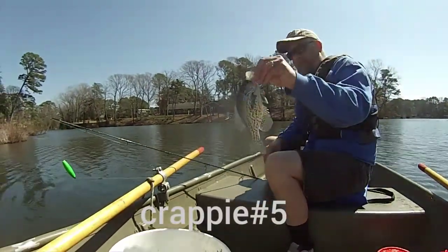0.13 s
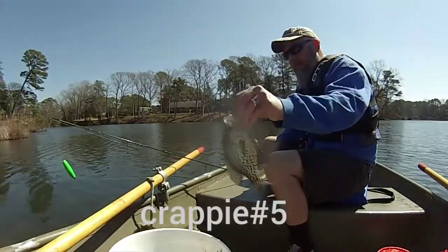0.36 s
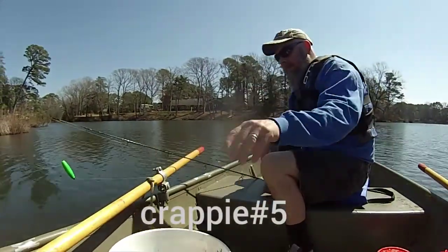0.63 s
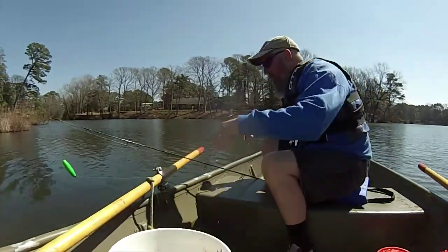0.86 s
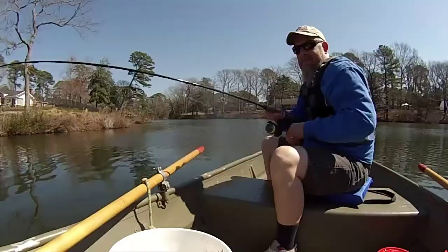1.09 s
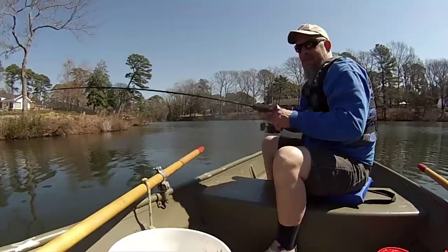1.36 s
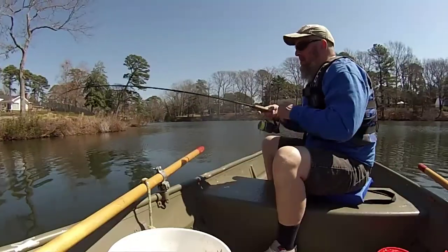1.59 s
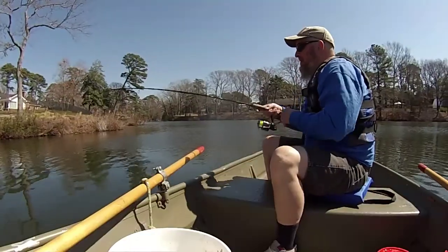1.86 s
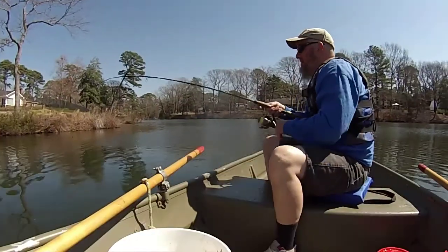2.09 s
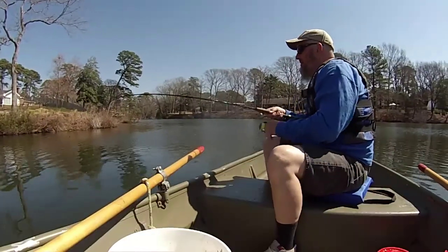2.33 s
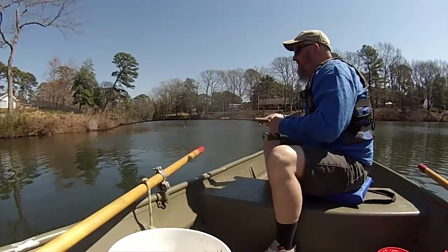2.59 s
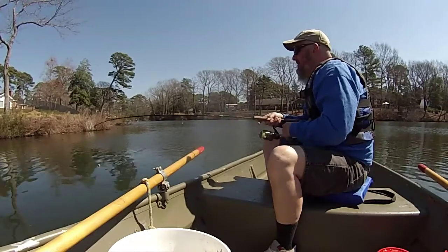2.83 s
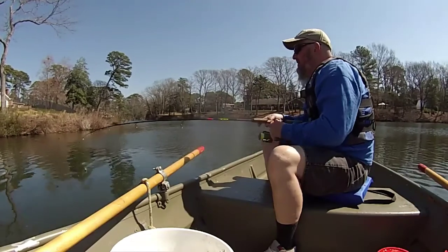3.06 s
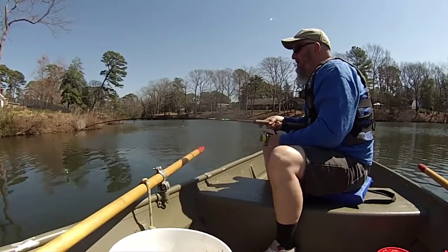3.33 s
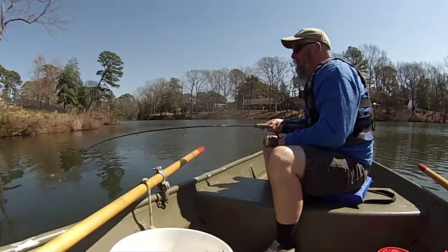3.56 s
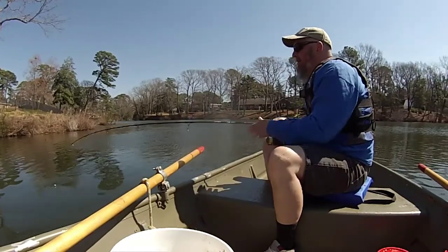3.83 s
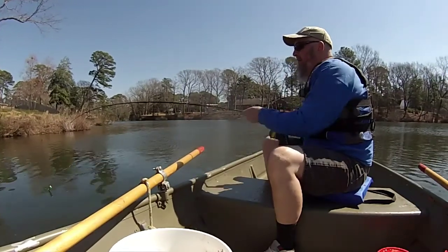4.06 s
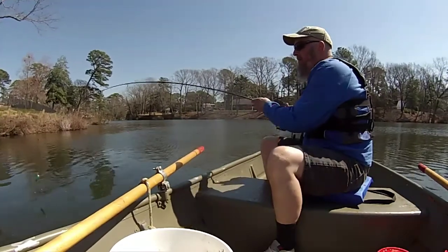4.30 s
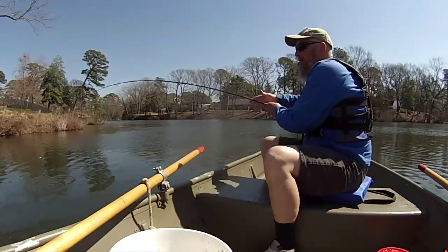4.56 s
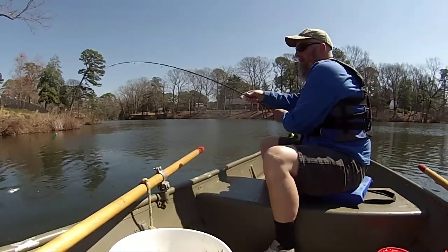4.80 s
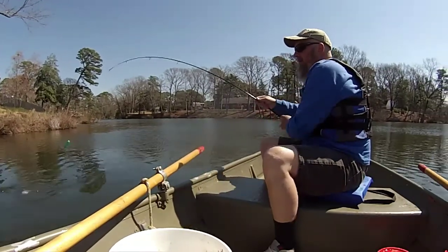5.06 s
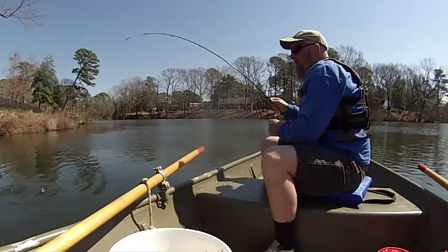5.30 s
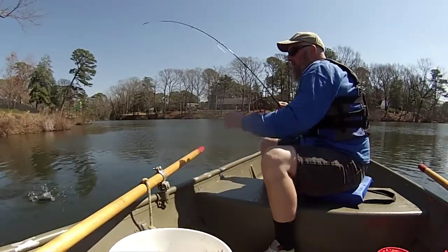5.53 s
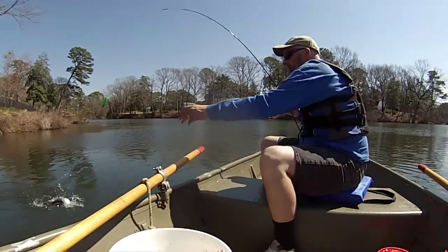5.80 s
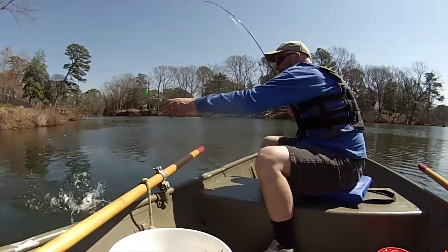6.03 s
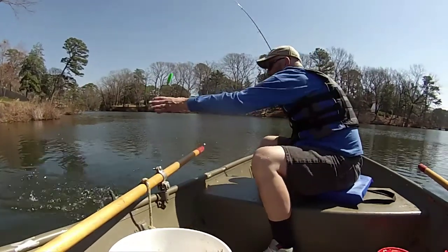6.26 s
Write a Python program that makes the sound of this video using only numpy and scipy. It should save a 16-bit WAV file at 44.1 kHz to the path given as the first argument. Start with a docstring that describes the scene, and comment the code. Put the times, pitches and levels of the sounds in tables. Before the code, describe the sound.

Wet slaps and hollow knocks on a small metal boat, a brief dropout, ticking reel, more bangs, then a fish splashing, over rumbling wind.

```python
"""Wet slaps and hollow knocks on a small metal boat on a lake, over wind rumble, nearly mono.
A loose part taps, a fishing reel ticks, and a fish splashes at the surface; water slops softly.
Hull sounds are short pushes or bursts of noise that set resonances ringing; the reel is scratches
into resonances; the splash is crackle and bubbles. Early on the sound stops dead, then fades in.
The listener is a microphone in a closed housing, which colours the slaps and the spray."""
import sys
import numpy as np
from scipy import signal
from scipy.io import wavfile

SR = 44100
rng = np.random.default_rng(int(sys.argv[2]) if len(sys.argv) > 2 else 0)


def store_pcm(level_fs):
    """Save levels as 16-bit WAV."""
    pcm = np.round(np.clip(level_fs, -1, 1) * 32767).astype(np.int16)
    wavfile.write(sys.argv[1], SR, np.atleast_2d(pcm).T)


def magnitude_from_level(level_db):
    """Linear magnitude for a level in decibels (20 dB per decade)."""
    exponent = np.asarray(level_db, float) / 20
    return 10 ** exponent


N = 282240

# In all tables, "fade" is the time in which a sound dies by 60 dB.
AIR_DB, SIDE_HISS_DB = -58.5, -75.5     # distant hiss; faint hiss that differs left and right
# Colour of the distant hiss. Each row: pitch in Hz, relative level in dB per Hz.
AIR_COLOUR = [(410, -1), (700, -2.5), (971, -14), (1170, 1), (1360, -8), (2630, -11.5), (8100, -21),
              (9600, -23.5), (13900, -26), (15200, -24), (16000, -46)]

# Wind on the microphone. Each row: time in seconds, rumble in dB, extra flutter in dB.
GUSTS = [(0.0, -36.5, 7), (0.5, -29.5, -6), (0.6, -19.5, -12.5), (0.71, -34.5, 1.5), (0.94, -24, 16.5),
         (0.98, -24, -5), (1.41, -28.5, 1), (1.75, -8.5, -8), (1.85, -24, -2), (2.03, -24, -2),
         (2.05, -26.5, -3), (2.78, -31.5, -4.5), (3.14, -18, -5), (3.28, -18.5, 9), (3.46, -29, 17.5),
         (3.49, -20.5, 8.5), (3.72, -24, -0.5), (3.9, -23, -2.5), (4.35, -30, -6), (5.4, -30, -3.5),
         (5.65, -39.5, 3), (6.38, -34.5, -2.5), (6.4, -41.5, 14)]
# Colour of the wind. Each row: pitch in Hz, relative level in dB per Hz.
RUMBLE_COLOUR = [(20, 5.5), (35, 0.5), (60, -1), (95, -3.5), (130, -7), (198, -11.5), (260, -18.5),
                 (375, -24.5), (600, -50), (900, -74)]
# Size and speed of the rumble's quick random lumps; share of them that reaches the flutter.
LUMP_DB, LUMPS_PER_S, FLUTTER_SHARE = -0.5, 61, 0.96

# Hollow puffs of water along the hull. Each row: time in seconds, level in dB, starting centre in Hz.
SLOP = [(0.0, -43.5, 630), (.178, -42, 792), (0.343, -44.5, 600)]
SLOP_RISE_S, SLOP_FADE_S, SLOP_SINK_OCT_PER_S, SLOP_HALF_WIDTH_HZ = 0.038, 0.54, 3, 183

# Thin dry clicks. Each row: start in seconds, level in dB, rise in ms, hint of pitch in Hz.
CLICKS = [(1.074, -23.5, 0.087, 300), (1.6097, -31.5, 0.1, 500), (1.6731, -31.5, .06, 900),
          (1.7378, -29.5, 0.29, 2250), (1.7397, -30.5, 0.075, 4480)]

# Turns of the reel handle. Each row: start in seconds, length in seconds, level in dB, ticks per second.
TURNS = [(1.786, 0.096, -53.5, 110), (1.958, 0.274, -53, 90), (2.27, 0.1635, -55, 140),
         (2.47, 0.135, -56.5, 45), (2.618, 0.046, -59.5, 80), (2.674, 0.076, -55, 90),
         (2.794, 0.011, -58, 90), (2.986, 0.0058, -59, 60), (3.018, 0.009, -59, 60)]
TURN_EDGE_S, TURN_GROWTH_DB_PER_S = 0.02, 2
# Resonances of the reel. Each row: pitch in Hz, width in Hz before narrowing, relative level in dB.
REEL_MODES = [(1740, 39, -2.5), (2700, 23, 0), (4300, 117, 8.5), (5350, 82, -5), (7100, 110, -8.5),
              (7680, 74, -2), (9000, 190, -11), (10400, 250, -12), (13400, 240, -15)]
# Reel pitch as the load on the line changes. Each row: time in seconds, shift in widest steps (held to -1..1).
REEL_PITCH = [(1.78, 0.068), (1.88, -0.39), (1.96, 0.25), (2.01, -0.74), (2.1, 0.49), (2.3, 0.65),
              (2.42, 0.092), (2.49, -.5), (2.54, 0.52), (2.65, -0.57), (2.7, -0.12), (2.8, -1.3), (2.98, 0)]
REEL_WIDEST_STEP, REEL_WAVERS_PER_S = 0.03, 12     # share of pitch; speed of random wavering
TICK_SPREAD_DB, SCRATCH_S = 2.0, 0.0022
REEL_RUB = 0.08     # steady rubbing, as a share of a tick
REEL_SPAN = slice(int(1.7 * SR), int(3.1 * SR))

# The fish breaks the surface. Each row: time in seconds, spray in dB, gurgle in dB, fade in seconds.
SPLASHES = [(5.4, -60, -71.5, 0.081), (5.475, -77, -54.5, 1.3), (5.528, -58, -62, 0.055),
            (5.552, -62, -53, .06), (5.567, -50, -62, 0.066), (5.62, -75, -67, 0.44),
            (5.665, -71, -58.5, 0.3), (5.768, -59, -49, 0.1), (5.799, -56, -65, 1.4),
            (5.839, -70, -45, 0.34), (5.88, -54, -66, 0.19), (5.938, -53.5, -49.5, 0.32),
            (6.039, -57, -43, 0.092), (6.08, -76, -78, 7.1), (6.13, -66, -55, 0.23),
            (6.187, -59, -58, 0.36), (6.248, -55.5, -68, .08), (6.283, -56.5, -56, 0.12)]
# Large bubbles. Each row: start in seconds, level in dB, first pitch in Hz, rise in octaves per second,
# fade in seconds.
BUBBLES = [(5.398, -25.5, 2890, 6.2, 0.0085), (5.475, -46, 1064, 5.4, 0.071),
           (5.511, -45, 1210, 4.9, 0.053), (5.556, -46, 1610, 4.6, 0.05), (5.557, -36.5, 3100, 3, 0.02),
           (5.556, -39, 425, 5, 0.043), (5.725, -44.5, 900, 6, .03), (5.6, -42.5, 4250, 2.4, 0.017),
           (5.71, -49, 3100, 2.6, 0.026), (5.74, -41.5, 610, 6.6, 0.057), (5.766, -51, 1530, 6, .02),
           (5.791, -37, 1350, 5, 0.015), (5.831, -35, 607, 18, 0.16), (5.857, -38, 2510, 3, .015),
           (5.887, -41, 2130, 3, 0.024), (5.965, -42.5, 4300, 3, .012), (5.954, -42.5, 1040, 4.6, 0.039),
           (5.55, -39, 4000, 3, 0.011), (5.565, -38, 4530, 3, .02), (5.848, -30, 1215, 3.9, 0.025),
           (5.858, -29.5, 392, 7.7, 0.041), (5.874, -25.5, 4300, 3, 0.0072), (5.89, -27.5, 456, 3.1, 0.023),
           (5.938, -33, 3150, 1.8, 0.022), (6.038, -34, 900, 9, 0.012), (6.04, -44, 1640, 3.6, 0.049),
           (6.087, -44.5, 1230, 5, 0.028), (6.335, -48, 1400, 4, .03), (6.18, -44, 2700, 3.6, 0.019),
           (6.288, -34, 3130, 5.8, 0.0071)]
SPLASH_RISE_S, SPLASH_FROM = 0.016, int(5.3 * SR)

# Resonances of the microphone's housing. Each row: pitch in Hz, width in Hz before widening,
# relative level in dB.
HOUSING = [(1020, 92, 20.5), (1640, 126, 20.5), (2130, 160, 13.5), (2700, 200, 14.5), (3150, 127, 18.5),
           (3830, 96, 15), (4300, 92, 16.5), (5670, 250, 10), (8000, 790, 8), (9310, 45, 15),
           (9300, 460, -3), (11500, 1560, 8.5), (12600, 509, -9)]
COLOUR_WANDER_DB, WANDERS_PER_S = 2.0, 30.0

# A loose part taps and bounces. Each row: start in seconds, tap in dB, bounce against the tap in dB,
# bounce delay in ms.
TAPS = [(1.049, -15.5, -28, 10.5), (3.452, -20.5, -3, 5), (3.496, -44, -12, 5), (3.527, -38, -15, 10.5),
        (3.554, -42, 7, 6.5), (3.592, -16, -9, 10.4), (3.671, -37, 2, 3.2), (3.74, -31, 2, 5.4),
        (3.775, -28.5, -3, 4.7), (3.808, -16, -6, 11), (3.95, -26, 0.5, 9.2), (3.992, -35.5, -19, 5.4)]
# What a tap sets ringing. Each row: pitch in Hz before the tap shifts it, level in dB, fade in seconds.
TAP_MODES = [(850, -11, 0.0029), (1175, -1, 0.0098), (1520, -10.5, 0.0045), (1880, -15, 0.002),
             (2250, -12, 0.0075)]
TAP_CLICK_DB = -13         # dry click beside the ringing
TAP_PITCH_SPREAD = 0.05    # each tap lands elsewhere and shifts the pitches by up to this share
BOUNCE_PITCH = 0.88        # the bounce rings lower by this factor

# The hardest contacts ring at their own pitch. Each row: start in seconds, level in dB, pitch in Hz,
# fade in seconds.
PINGS = [(.7715, -39, 3900, .008), (0.9627, -15, 3660, .008), (0.963, -26, 8400, .006),
         (.942, -28, 1300, .012), (.993, -29, 1600, 0.013), (3.17, -26.5, 1900, 0.017),
         (3.173, -11, 3100, 0.0068), (3.186, -28.5, 1110, 0.026), (3.217, -23.5, 4000, 0.012),
         (3.228, -23, 480, 0.05), (3.24, -9.5, 381, 0.12), (3.248, -26, 8060, .006),
         (3.302, -19, 1480, 0.022), (3.304, -9, 8420, 0.009), (3.315, -30, 1700, .012),
         (3.328, -30, 890, 0.016), (3.3815, -6, 270, 0.066), (3.381, -16, 630, .04),
         (3.382, -24, 850, 0.037), (3.411, -32, 1440, .015)]
PING_CONTACT_S = 0.0015

# Wet slaps and ticks. Each row: peak time in seconds, low, middle and high part in dB,
# fade of the middle part in seconds.
SLAPS = [(.751, -65, -39, -32, 0.027), (.7545, -55, -31, -37, 0.028), (.7635, -58, -36, -33, 0.017),
         (.7715, -65, -30, -33, 0.028), (.778, -65, -35, -49, 0.027), (.785, -61, -51, -42, .02),
         (.793, -45, -54, -39, 0.03), (.808, -37.5, -48, -63, 0.048), (.812, -50, -48, -45, .012),
         (.823, -39, -57, -53, 0.068), (.8474, -38, -38, -31.5, 0.029), (.866, -29.5, -44, -67, 0.044),
         (.880, -50, -54, -60, 0.027), (.904, -36.5, -49, -42, 0.033), (.9194, -49, -57, -45, 0.018),
         (.930, -22, -47, -48, 0.03), (.935, -28, -51, -51, 0.023), (.940, -22, -48, -35, 0.032),
         (.9488, -45, -31, -40, 0.02), (.9625, -26, -31, -29.5, 0.023), (.975, -26.5, -44, -36.5, 0.034),
         (.992, -23.5, -59, -64, 0.043), (1.003, -46, -60, -55, 0.042), (1.0275, -63, -68, -48, 0.021),
         (1.535, -71, -54, -57, 0.05), (1.718, -70, -52, -54, 0.013), (3.0504, -49.5, -74, -38, 0.021),
         (3.0713, -56, -53, -56, 0.027), (3.143, -57, -48, -48.5, 0.045), (3.164, -43, -39, -47, 0.043),
         (3.172, -37.5, -17.5, -26.5, 0.02), (3.182, -30, -65, -77, 0.02),
         (3.218, -44, -33.5, -43.5, 0.063), (3.2484, -62, -29, -32, 0.035), (3.270, -57.5, -46, -40, 0.017),
         (3.285, -51.5, -67, -72, 0.01), (3.3018, -49, -39, -39, .02), (3.3045, -32, -12, -18.5, 0.023),
         (3.314, -31, -50, -57, 0.024), (3.3274, -38.5, -60, -69, 0.014), (3.3822, -31.5, -64, -49, 0.028),
         (3.413, -40.5, -67, -65, 0.042), (3.428, -52, -52, -50.5, 0.1), (3.46, -60, -57, -55.5, 0.037),
         (3.6325, -70, -54, -60, 0.036), (4.0625, -45.5, -62, -53, 0.032)]
# Flurries of small random slaps. Each row: start in seconds, length in seconds, typical low, middle
# and high part in dB.
FLURRIES = [(0.764, .04, -62, -49, -44.5), (0.805, 0.24, -57, -68, -55), (3.156, 0.027, -56, -50, -43),
            (3.177, 0.096, -53, -83, -71), (3.309, 0.036, -48, -72.5, -79),
            (3.376, .1, -55.5, -77.5, -63.5)]
FLURRY_PER_S, FLURRY_SPREAD_DB, FLURRY_FADE_S = 220, 6.0, 0.017    # spread is up or down
# At some bursts the treble comes out unequally left and right. Each row: time in seconds, side against the high
# part in dB.
SIDEWAYS = [(.7545, 4), (.7715, -17), (.8474, -14), (.9625, -4), (3.172, 9)]
GRIT_DB = 2.8
LEAD_IN_DB, LEAD_IN_DB_PER_S = -26, 3000

# Knocks on the hull. Each row: time in seconds, strength in dB, contact in ms,
# tilt towards the higher modes in dB per octave.
KNOCKS = [(0.754, -9.5, 3.35, 5), (0.767, -24, 1.66, 1.5), (0.819, -1, 3.6, -2.5), (0.826, -19, 2.56, 11),
          (0.851, -23.5, 0.5, 1), (0.887, -15.5, 2.1, -9), (0.931, -8, 2.97, -5), (0.939, -3.5, 2.9, 0),
          (1.001, -15, 0.98, -7), (1.019, -8, 4.9, 4), (1.0554, -8, 1.06, 4.5), (3.056, -19, 2.9, -6),
          (3.171, -12.5, 1.54, 3.5), (3.217, -11, 1.85, 4.5), (3.245, -9.5, 1.9, 0), (3.256, -17, 2.08, 6),
          (3.307, -15.5, 0.29, 2), (3.36, -26, 3.5, 2), (3.383, -7.5, 0.58, 1.5), (3.434, -22, 3.1, 1),
          (3.492, -20, 4.9, -10), (3.55, -19, 3, -17), (3.594, -25, 1.6, 0)]
# Ringing modes of the hull. Each row: pitch in Hz, level in dB, fade in seconds.
HULL = [(66, -23, 0.084), (105.5, -12, 0.091), (132, -16, 0.22), (198, -2, 0.04), (205.8, 2, 0.12),
        (231.1, 1, 0.18), (291.5, -1.5, 0.11), (299, 4.5, 0.025), (377.2, -22, 0.51), (423, -24, 0.091),
        (505, -15.5, 0.2), (593, -18.5, 0.16), (794, -14, 0.034), (915, -12, 0.023)]
TILT_PIVOT_HZ = 220

# When the sound stops, how fast it stops, how long it stays away, how long it takes to fade in.
STOP_S, CUT_S, GAP_S, FADE_IN_S = 1.0553, 0.00012, 0.011, 0.014


def rms_one(x):
    """Scales a sound to an average (rms) strength of 1."""
    return x / np.sqrt(np.mean(x ** 2) + 1e-20)


def band(x, low_hz, high_hz):
    """Keeps the pitches between two limits."""
    return signal.sosfilt(signal.butter(2, [low_hz, high_hz], "band", fs=SR, output="sos"), x)


def drift(rate):
    """Smooth random wandering with spread 1, drawn at every 40th sample; a higher rate wanders faster."""
    r = np.exp(-80 * np.pi * rate / SR)
    slow = signal.lfilter([1], [1, -2 * r, r * r], rng.standard_normal(N // 40 + 2002))[2000:]
    return np.interp(np.arange(N) / 40, np.arange(len(slow)), rms_one(slow))


def swell(s, rise_s, fade_s):
    """Gain that climbs its last 20 dB in rise_s, reaches 1 at time s and then dies away."""
    t = np.arange(N) / SR - s
    return magnitude_from_level(np.where(t < 0, 20 * t / rise_s, -60 * t / fade_s))


def ring(hits, hz, fade_s):
    """A single hit of height 1 sets a dying sine of starting height 1 ringing."""
    r, w = magnitude_from_level(-60 / (fade_s * SR)), 2 * np.pi * hz / SR
    return signal.lfilter([0, np.sin(w)], [1, -2 * r * np.cos(w), r * r], hits + 1e-18)


def resonance(x, hz, width_hz, level_db):
    """A resonance lets through one pitch and its near neighbours."""
    r = np.exp(-np.pi * width_hz / SR)
    peak = signal.lfilter([1, 0, -1], [1, -2 * r * np.cos(2 * np.pi * hz / SR), r * r], x + 1e-18)
    return magnitude_from_level(level_db) * (1 - r * r) / 2 * peak


def coloured(spectrum, patchy_db, patch_rate):
    """Bands of noise, five in two octaves, each flickering partly alone; returns centres and bands."""
    hz, level = np.transpose(spectrum)
    top = min(hz[-1], 14600)
    edges = top / 2 ** np.arange(0, np.log2(top / hz[0]), 0.4)[::-1]
    white, together = rng.standard_normal((2, N)), drift(patch_rate / 3)
    centres = np.sqrt(edges[1:] * edges[:-1])
    bands = []
    for k, centre in enumerate(centres):
        level_db = np.interp(np.log(centre), np.log(hz), level)
        flicker_db = patchy_db * (together + 2.5 * drift(patch_rate))
        bands.append(band(white[k % 2], edges[k], edges[k + 1]) * magnitude_from_level(level_db + flicker_db))
    bands = np.array(bands)
    return centres, bands / np.std(bands.sum(axis=0))


def housed(grit):
    """Noise through and past the housing's wandering resonances; returns low, middle, high of rms 1."""
    heard = magnitude_from_level(4.5) * grit
    for k, (hz, width, level_db) in enumerate(HOUSING):
        driven = grit * magnitude_from_level(COLOUR_WANDER_DB * drift(WANDERS_PER_S)[:len(grit)] + 10.5)
        heard = heard + (-1) ** k * resonance(driven, hz, width * 1.8, level_db)
    parts = ((700, 2500, 1), (2500, 5700, -1), (7200, 16000, 1))    # signs let the parts join without a notch
    return np.array([sign * rms_one(band(heard, low_hz, high_hz)) for low_hz, high_hz, sign in parts])


def distant_air():
    """Distant hiss: coloured noise that flickers slightly."""
    return magnitude_from_level(AIR_DB) * coloured(AIR_COLOUR, patchy_db=0.5, patch_rate=1.5)[1].sum(axis=0)


def side_hiss():
    """Faint noise that enters left and right with opposite signs."""
    return magnitude_from_level(SIDE_HISS_DB) * rms_one(band(rng.standard_normal(N), 690, 7700))


def wind():
    """Lumpy low noise; the faster flutter in its higher bands swells by its own amount."""
    s, rumble_db, flutter_db = np.transpose(GUSTS)
    t = np.arange(N) / SR
    rumble_db, flutter_db = np.interp(t, s, rumble_db), np.interp(t, s, flutter_db)
    centres, bands = coloured(RUMBLE_COLOUR, patchy_db=1.06, patch_rate=2.76)
    reach = np.clip(np.log2(centres / 80) / 0.75, 0, 1)[:, None]      # how far a band follows the flutter
    lumps_db = LUMP_DB * drift(LUMPS_PER_S) * (1 - reach * (1 - FLUTTER_SHARE))
    return magnitude_from_level(rumble_db) * np.sum(bands * magnitude_from_level(reach * flutter_db + lumps_db), axis=0)


def slop():
    """Noise in a hollow whose pitch sinks: a narrow low band shifted to the moving centre."""
    out, t = 0, np.arange(N) / SR
    lowpass = signal.butter(2, SLOP_HALF_WIDTH_HZ, fs=SR, output="sos")
    for s, level_db, hz in SLOP:
        wobble = signal.sosfilt(lowpass, rng.standard_normal((2, N)))
        pitch = hz * 2 ** (-SLOP_SINK_OCT_PER_S * np.clip(t - s, 0, 1))
        phase = 2 * np.pi * np.cumsum(pitch) / SR
        puff = rms_one(wobble[0] * np.cos(phase) + wobble[1] * np.sin(phase))
        out = out + magnitude_from_level(level_db) * swell(s, SLOP_RISE_S, SLOP_FADE_S) * puff
    return out


def clicks():
    """Each click is a rounded pulse of a few ms at most, with a hint of pitch."""
    out, t = np.zeros(N), np.arange(int(0.005 * SR)) / SR
    for s, peak_db, rise_ms, hz in CLICKS:
        u = 1000 * t / rise_ms
        pulse = u * np.exp(1 - u) * np.cos(2 * np.pi * hz * t)
        out[int(s * SR):int(s * SR) + len(t)] += magnitude_from_level(peak_db) * pulse
    return out


def turning():
    """Each handle turn fades in, grows slightly and fades out; returns gain and tick rate."""
    t, gain = np.arange(N) / SR, 0
    for start, length, level_db, _ in TURNS:
        edge = np.clip(np.minimum(t - start, start + length - t) / TURN_EDGE_S + 1, 0, 1)
        gain = gain + edge ** 2 * magnitude_from_level(level_db + TURN_GROWTH_DB_PER_S * np.clip(t - start, 0, length))
    starts, rates = np.transpose(TURNS)[[0, 3]]
    return gain, rates[np.clip(np.searchsorted(starts, t) - 1, 0, None)]


def reel():
    """A pawl ticks unevenly over gear teeth; each tick scratches resonances that wax, wane and waver."""
    gain, ticks_per_s = turning()
    teeth = np.cumsum(ticks_per_s * magnitude_from_level(2.0 * drift(25.0)) / SR)
    ticks = np.diff(np.floor(teeth), prepend=0)
    ticks[(np.transpose(TURNS)[0] * SR).astype(int)] = 1      # every turn opens with a tick
    ticks = ticks * magnitude_from_level(TICK_SPREAD_DB * rng.standard_normal(N))
    scratch = signal.lfilter([1], [1, -np.exp(-1 / (SCRATCH_S * SR))], ticks) + REEL_RUB
    scratch = (scratch * rng.standard_normal(N))[REEL_SPAN]
    waver = np.interp(np.arange(N) / SR, *np.transpose(REEL_PITCH)) + 0.13 * drift(REEL_WAVERS_PER_S)
    waver = np.clip(waver[REEL_SPAN], -1, 1)
    body = 0
    for hz, width, level_db in REEL_MODES:
        driven = scratch * magnitude_from_level(2.0 * drift(11.4)[REEL_SPAN])
        for shift in (-1, -0.5, 0, 0.5, 1):     # blend between five fixed pitches
            share = np.sqrt(np.clip(1 - 2 * np.abs(waver - shift), 0, 1))
            body = body + resonance(driven * share, hz * (1 + REEL_WIDEST_STEP * shift), width * 0.9, level_db)
    out = np.zeros(N)
    out[REEL_SPAN] = rms_one(body) + magnitude_from_level(-13.0) * rms_one(band(scratch, 1600, 9300))
    return out * gain


def droplets(length):
    """Small bubbles at random, each ringing about a dozen cycles, at pitches over three octaves."""
    born = (rng.random(length) < 240 / SR) * magnitude_from_level(2.0 * np.minimum(rng.exponential(1, length), 3))
    pitches, dealt = np.geomspace(400, 3400, 20), rng.integers(0, 20, length)
    return rms_one(sum(ring(born * (dealt == k), hz, 13.0 / hz) for k, hz in enumerate(pitches)))


def bubbles():
    """Each large bubble is a sine that rises in pitch as it dies."""
    out, t = np.zeros(N), np.arange(int(0.1 * SR)) / SR
    for s, level_db, hz, rise, fade_s in BUBBLES:
        phase = 2 * np.pi * np.cumsum(hz * 2 ** (rise * t)) / SR
        bubble = magnitude_from_level(level_db - 60 * t / fade_s) * np.minimum(t / 0.0013, 1) * np.sin(phase)
        at = int(s * SR)
        out[at:at + len(t)] += bubble[:N - at]
    return out


def splash():
    """Clumped crackle of spray, a gurgle of small bubbles, and large bubbles."""
    out, length, power = np.zeros(N), N - SPLASH_FROM, 0
    for s, spray_db, gurgle_db, fade_s in SPLASHES:
        levels = magnitude_from_level([[spray_db], [gurgle_db]])
        power = power + (levels * swell(s, SPLASH_RISE_S, fade_s)) ** 2
    spray, gurgle = np.sqrt(power)[:, SPLASH_FROM:]
    clumps = magnitude_from_level(3.3 * drift(48.0)[:length])
    drops = (rng.random(length) < 1600 * clumps / SR) * rng.standard_normal(length)
    low, middle, high = housed(drops + 0.08 * rng.standard_normal(length))
    high_gain = magnitude_from_level(-6.0 + 0.76 * drift(32.0)[:length])
    crackle = magnitude_from_level(-5.0) * low + magnitude_from_level(2.0) * middle + high_gain * high
    out[SPLASH_FROM:] = spray * crackle + gurgle * droplets(length)
    return out + bubbles()


def taps():
    """A rounded click and its lower bounce on short modes; the hull passes only the middle range."""
    out, length, soft = np.zeros(N), int(0.04 * SR), np.hanning(16) / 7
    for s, peak_db, bounce_db, delay_ms in TAPS:
        place = 1 + TAP_PITCH_SPREAD * rng.uniform(-0.18, 1)
        tap = (s, magnitude_from_level(peak_db), 1)
        bounce = (s + delay_ms / 1000, -magnitude_from_level(peak_db + bounce_db), BOUNCE_PITCH)
        for start, gain, pitch in (tap, bounce):
            click = gain * np.pad(soft, (0, length - len(soft)))
            rings = sum(magnitude_from_level(level_db) * ring(click, hz * pitch * place, fade_s)
                        for hz, level_db, fade_s in TAP_MODES)
            at = int(start * SR)
            out[at:at + length] += magnitude_from_level(TAP_CLICK_DB) * click + rings
    return band(band(out, 760, 2350), 400, 1940)


def pings():
    """A few quick uneven touches set one short resonance going."""
    out, length = np.zeros(N), int(0.1 * SR)
    for (s, level_db, hz, fade_s), u in zip(PINGS, rng.random((len(PINGS), 3))):
        touches = np.zeros(length)
        touches[0] = 1
        touches[1 + (u[:2] * PING_CONTACT_S * SR).astype(int)] = u[2], -0.5
        ping = band(ring(touches, hz, fade_s), hz / 3, hz * 2)
        out[int(s * SR):int(s * SR) + length] += magnitude_from_level(level_db) * ping
    return out


def slaps():
    """Gritty bursts with a faint lead-in and a quick fall, treble dying first; returns mid and side."""
    grit = rng.standard_normal((2, N)) * magnitude_from_level(GRIT_DB * np.minimum(rng.exponential(1, (2, N)), 5))
    rows, chance = list(SLAPS), rng.random((len(FLURRIES), FLURRY_PER_S, 4))
    for (start, length, *parts_db), draws in zip(FLURRIES, chance):
        for u in draws[draws[:, 0] < length]:
            small_db = parts_db + FLURRY_SPREAD_DB * (2 * u[1:] - 1)
            rows.append((start + u[0], *small_db, FLURRY_FADE_S))
    envelope, t = np.zeros((4, N)), np.arange(-0.03, 0.2, 1 / SR)
    lasting = np.array([[1.3], [1.0], [0.7], [0.7]])      # low, middle, high, side
    lead = magnitude_from_level(10000 * t) + magnitude_from_level(LEAD_IN_DB + LEAD_IN_DB_PER_S * t)      # sharp rise plus faint lead-in
    for s, *parts_db, fade_s in rows:
        at = int((s + t[0]) * SR)
        side_db = max([level for when, level in SIDEWAYS if abs(when - s) < 0.0025], default=-40)
        shape = np.where(t < 0, lead, magnitude_from_level(-60 * t / (fade_s * lasting)))
        levels = magnitude_from_level(parts_db + [parts_db[2] + side_db])
        envelope[:, at:at + len(t)] += levels[:, None] * shape
    parts = housed(grit[0])
    unalike = 1.04 * band(grit[1], 6500, 12200) - 0.22 * parts[2] - 0.6 * band(parts[2], 11000, 16500)
    return np.sum(envelope[:3] * parts, axis=0), envelope[3] * unalike


def thuds():
    """Countless close modes of the plating answer each knock as a rough, quickly dying thud."""
    hits = np.zeros(N)
    for s, peak_db, contact_ms, _ in KNOCKS:
        hits[int((s - 0.002) * SR)] = magnitude_from_level(peak_db - 9.0 - 5.4 * contact_ms)     # softer contact, weaker thud
    dying = signal.lfilter([1], [1, -magnitude_from_level(-60 / (0.12 * SR))], hits)
    return band(dying * rms_one(band(rng.standard_normal(N), 210, 720)), 230, 1100)


def knocks():
    """Each knock softly pushes all hull modes, by uneven amounts; neighbours swing opposite ways."""
    out, strength = np.zeros(N), magnitude_from_level(0.5 * rng.standard_normal((len(KNOCKS), len(HULL))))
    for m, (hz, level_db, fade_s) in enumerate(HULL):
        force = np.zeros(N)
        for e, (s, peak_db, contact_ms, tilt_db) in enumerate(KNOCKS):
            push = np.hanning(int(np.clip(contact_ms, 0.2, 8) * SR / 1000) + 3)
            gain = magnitude_from_level(peak_db + level_db + tilt_db * np.log2(hz / TILT_PIVOT_HZ)) * strength[e, m]
            at = int((s - 0.002) * SR)
            force[at:at + len(push)] += push / push.sum() * gain
        out += (-1) ** m * ring(force, hz, fade_s)
    return out


def scene():
    """Adds all sources; sum and difference of mid and side give left and right."""
    slap, slap_side = slaps()
    hull = knocks() + thuds() + slap + pings() + taps()
    since = np.arange(N) / SR - STOP_S
    hull = hull * ((since < 0) | (since > 0.4))      # the hull stays silent for 0.4 s after the stop
    mid = distant_air() + wind() + slop() + clicks() + reel() + splash() + hull
    side = side_hiss() + slap_side
    return np.array([mid + side, mid - side])


def top_cut(x):
    """Nothing passes above the cut-off."""
    return signal.sosfilt(signal.butter(12, 15830, fs=SR, output="sos"), x)


def record(dry):
    """The sound stops dead and fades in again; peaks are rounded and the top is cut."""
    since = np.arange(N) / SR - STOP_S
    before = np.clip(-since / CUT_S, 0, 1)
    after = np.clip((since - GAP_S) / FADE_IN_S, 0.001, 1)
    rounded = 0.66 * np.tanh(dry * np.where(since < 0, before, after) / 0.88)
    finished = signal.sosfilt(signal.butter(6, 15000, fs=SR, output="sos"), rounded)
    return top_cut(finished)


dry = scene()
out = record(dry)
store_pcm(out)
```